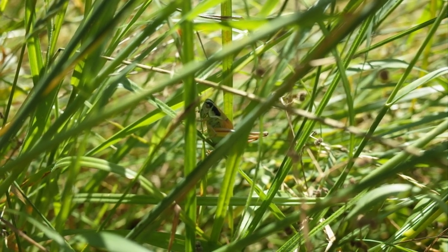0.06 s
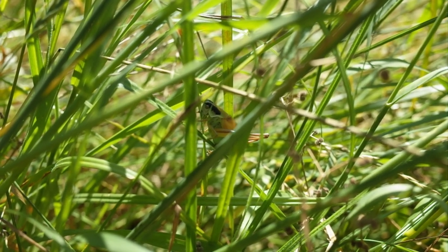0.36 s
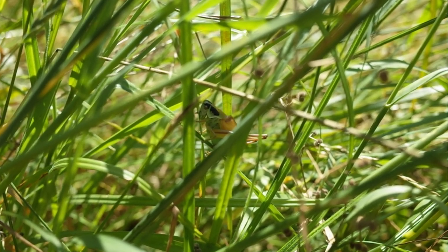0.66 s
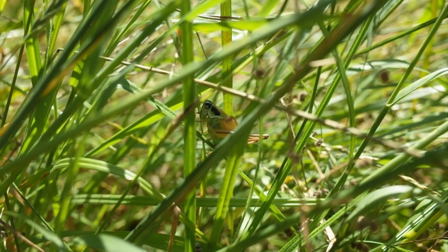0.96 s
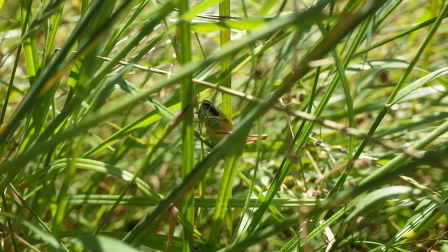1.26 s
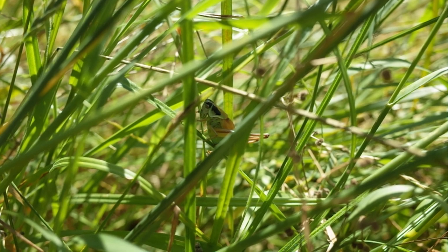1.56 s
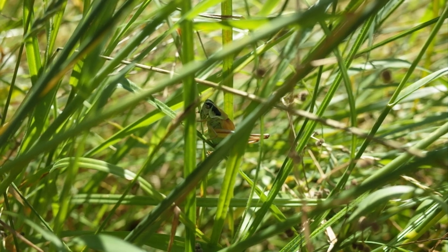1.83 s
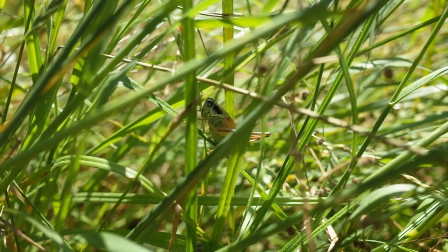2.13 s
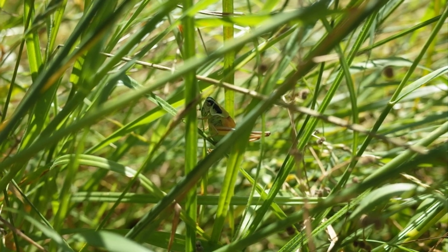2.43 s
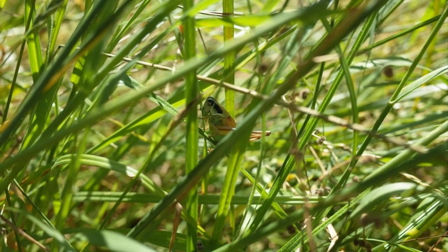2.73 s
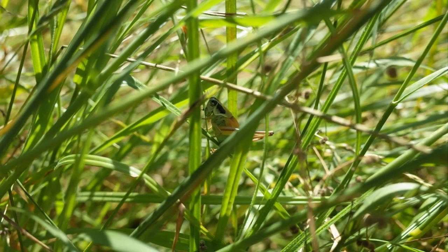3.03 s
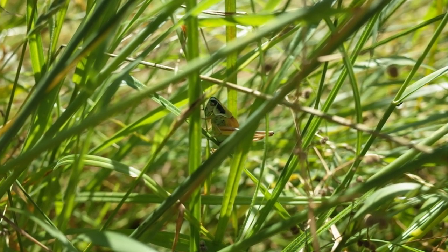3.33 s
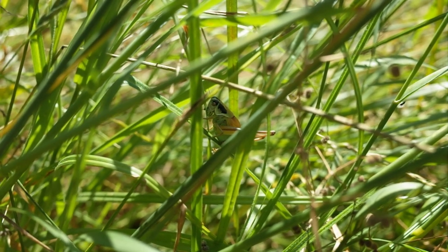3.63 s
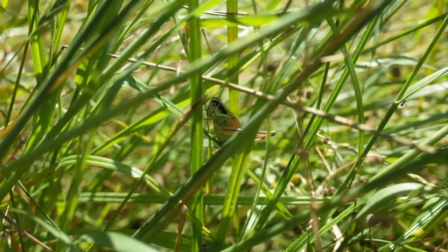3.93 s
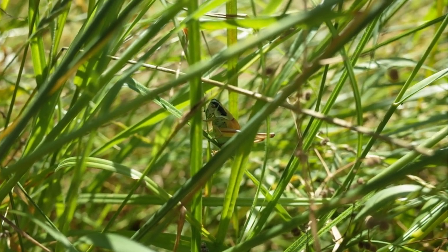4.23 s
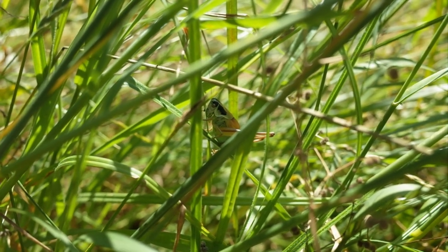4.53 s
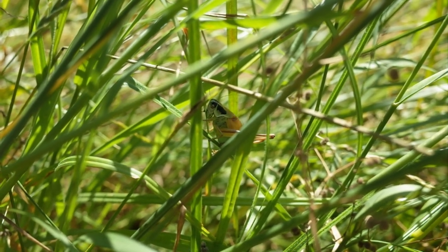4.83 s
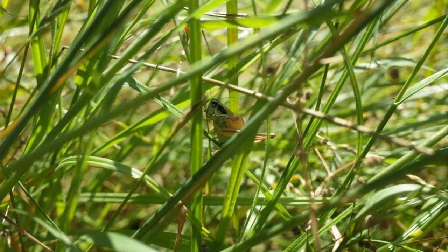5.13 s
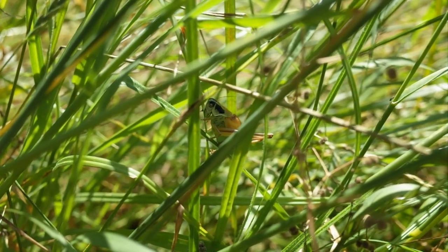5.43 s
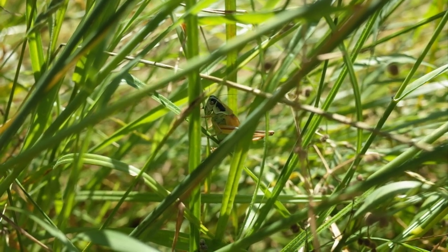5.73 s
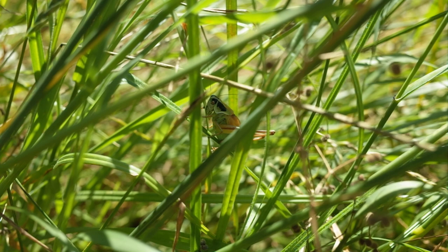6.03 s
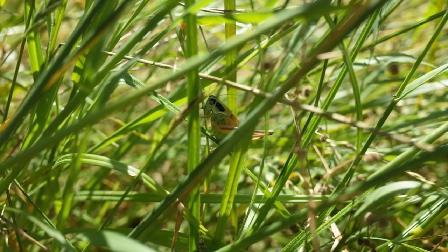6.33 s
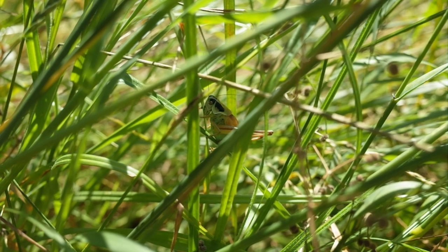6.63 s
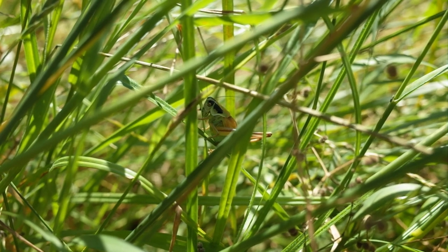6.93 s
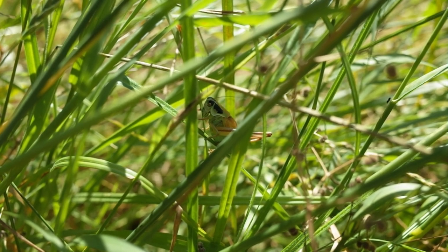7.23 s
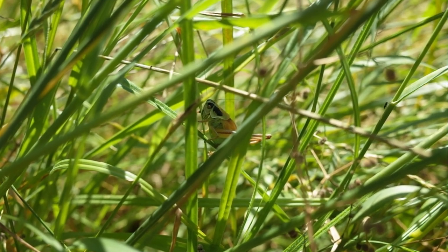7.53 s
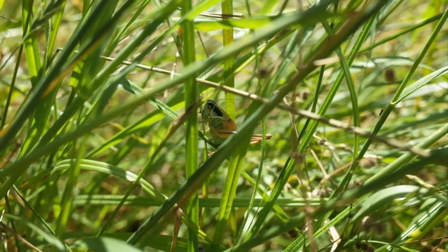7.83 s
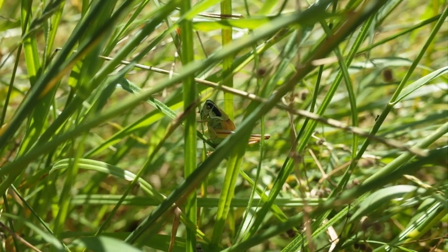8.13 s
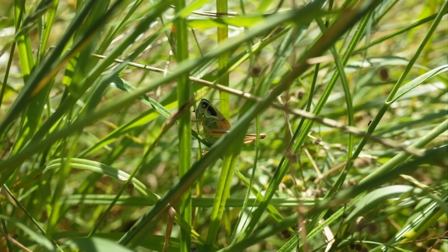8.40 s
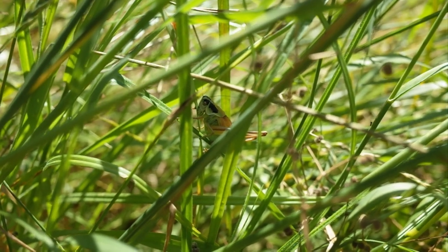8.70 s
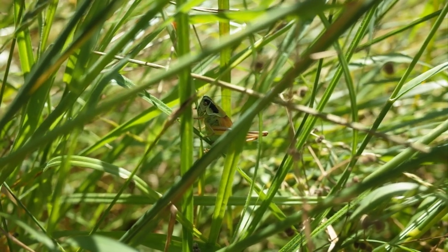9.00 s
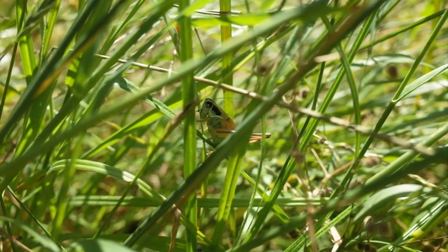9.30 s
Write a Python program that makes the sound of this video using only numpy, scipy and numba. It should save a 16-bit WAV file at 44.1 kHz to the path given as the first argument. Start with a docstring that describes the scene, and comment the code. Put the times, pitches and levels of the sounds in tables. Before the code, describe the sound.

A bush cricket rasps high, pulsing chirps up close in a meadow, with faint insects buzzing and answering further off.

```python
"""A bush cricket rasps in sunny grass, right at a camera's stereo microphone: two chirps, then the
start of a louder third. Its wings scuff softly open, then close with a run of tooth strikes.
Further off, other bush crickets answer or buzz, a grasshopper ticks and a far bird rolls short calls.
The lens motor taps faintly in the camera body. Each chirp overloads the gain control, so the
meadow ducks and swells back."""
import sys
import numpy as np
from scipy import signal
from scipy.fft import rfft, irfft
from scipy.io import wavfile
from scipy.ndimage import uniform_filter1d
from numba import njit

SR = 44100
rng = np.random.default_rng(int(sys.argv[2]) if len(sys.argv) > 2 else 0)


def wrap_up_sound(samples):
    """Save the sound to the file named by the first command line argument, as 16-bit audio."""
    columns = np.atleast_2d(samples).T
    # keep every value between -1 and 1, then stretch to whole-number steps
    tamed = np.clip(columns, -1, 1)
    steps = np.round(tamed * 32767).astype(np.int16)
    wavfile.write(sys.argv[1], SR, steps)


N = 421596
TIME = np.arange(N) / SR
FREQS = np.maximum(np.fft.rfftfreq(N, 1 / SR), 1)

# the near cricket's chirps: first_syllable_end_s, period_s, last_syllable_delay_s, level_db
NEAR_CHIRPS = [(0.3882, .0896, .0085, -0.5), (4.8434, .0887, .0135, 0), (9.588, .089, .01, 20.5)]
# three wing jerks ahead of each chirp: start_s, end_s, level_db, attack_s
WING_JERKS = [(.239, 0.251, -4, 0.00086), (.255, .266, 9.5, 0.003), (.268, .287, 10, 0.0014),
              (4.6943, 4.707, -1, 0.0024), (4.712, 4.723, 10.5, 0.0039), (4.724, 4.744, 12, 0.0038),
              (9.4305, 9.444, -0.5, 0.00089), (9.4497, 9.46, 6, .002), (9.4613, 9.486, 22.5, 0.019)]
# three scuffs of one wing opening: delay_s, length_s, level_db, pitch_ratio
OPENING_SCUFFS = [(-.0005, .0115, 2.1, 1.02), (0.013, .006, -1, 0.87), (.02, .008, -0.5, 1.03)]
# ring of the wing membrane: frequency_hz, level_db
WING_SPECTRUM = [(50, -66.5), (500, -35), (3500, -42.5), (5500, -39), (7200, -30), (8000, -15.5),
                 (8700, -4.5), (9400, 2.5), (10300, -1), (11200, -4.5), (12000, -2), (13100, -5.5),
                 (14400, -10.5), (15800, -19)]
# wing rubbing on wing: frequency_hz, level_db
RUB_SPECTRUM = [(2500, -66), (4400, -6.5), (5600, 13.5), (7000, 5), (9000, -13.5)]
# phase between the two microphone capsules: frequency_hz, left_lead_rad
MIC_PHASE = [(7500, -0.81), (10400, .15), (11700, -0.18), (13500, -0.83), (15000, 0.83)]
# balance between the capsules: frequency_hz, left_minus_right_db
MIC_BALANCE = [(8000, -1.5), (11000, -1), (14000, .4)]
# loud snaps at the hardest point of a stroke: time_s, level_db
HARD_SNAPS = [(.465, -15.5), (.645, -12.5), (.917, -11.5), (1.003, -22), (1.19, -20), (4.92, -14.5),
              (5.187, -13), (5.367, -16.5), (5.45, -11), (5.642, -8.5), (9.465, -14.5), (9.473, -3),
              (9.481, -3)]
# colour of a snap: frequency_hz, level_db
SNAP_SPECTRUM = [(60, 5), (400, 5), (4500, 5.5), (8000, -19.5)]
# crickets answering further off: first_s, last_s, period_s, level_db, treble_tilt_db_per_octave
ANSWERING_CHIRPS = [(.02, .905, .0885, -31, 10), (2.36, 2.6, .125, -51, -8), (2.73, 2.988, .13, -42.5, -14),
                    (3.11, 4.385, .127, -41, -23), (4.444, 5.433, .089, -30.5, 10),
                    (5.751, 7.738, .083, -39, 12), (8.763, 9.558, .0885, -32, 11)]
# course of the far crickets' buzz: time_s, level_db
BUZZ_LEVELS = [(0, -34.5), (1.4, -44), (2.3, -43.5), (3.2, -38.5), (4.2, -37.5), (5.8, -37.5), (7, -39.5),
               (7.8, -41.5), (8.3, -40), (9.5, -38.5)]
# colour of that buzz: frequency_hz, level_db
BUZZ_SPECTRUM = [(6500, -28.5), (8400, -12), (10500, -12.5), (12000, -4), (13000, -6), (14700, -1.5),
                 (15800, -9.5)]
# the grasshopper's verses: first_s, last_s, period_s, level_db
GRASSHOPPER_VERSES = [(3.31, 4.041, .0665, -36.5), (7.254, 8.043, .0657, -36.5)]
# rasp of its leg file: frequency_hz, level_db
LEG_SPECTRUM = [(4000, -31), (5400, -11.5), (5900, -4), (7000, -4), (7800, -4.5), (10000, -1), (12300, 7.5),
                (15800, 1.5)]
# resonances of its wing: frequency_hz, width_hz, lift_db
GRASSHOPPER_RINGS = [(5960, 180, 7.5), (6550, 100, 7), (6980, 120, 9)]
# the far bird's calls: start_s, end_s, level_db
BIRD_CALLS = [(1.58, 1.82, -56.5), (4.51, 4.687, -51), (7.435, 7.585, -51.2), (8.472, 8.61, -51.2)]
# dry stems ticking in the grass: time_s, level_db
DRY_TICKS = [(1.51, -36.5), (5.96, -34)]
# colour of a stem's tick: frequency_hz, level_db
STEM_SPECTRUM = [(300, 8), (1500, 1), (4000, -9), (9000, -15)]
# runs of lens motor taps: first_s, last_s, period_s
LENS_RUNS = [(0.062, .21, .15), (2.294, 3.169, .1455), (3.241, 4.248, .167), (4.508, 4.646, .14),
             (6.677, 8.091, .142), (8.328, 9.238, .152)]
# open air over the meadow: frequency_hz, level_db
AIR_SPECTRUM = [(15, -26.5), (25, 0.5), (150, -2.5), (194, -0.5), (264, -5), (394, -4.5), (476, -7.5),
                (662, -10.5), (879, -10), (2260, -17.5), (3370, -15.5), (3700, -18.5), (7000, -22.5),
                (9100, -56.5), (15400, -120)]
# how alike that air is at the two capsules: frequency_hz, correlation
AIR_CORRELATION = [(60, .3), (600, 0.39), (3000, 0)]
# the camera's circuit rumble: frequency_hz, level_db
CIRCUIT_SPECTRUM = [(20, 2), (90, -7), (300, -14.5), (2000, -38)]

OPENING_S = .029  # from the start of a syllable until the wings begin to close


def near_cricket(rebound=0.5, rebound_s=.00026, rub_db=-28):
    """Right at the microphone: a scraper strikes the teeth of a file, and each strike rings the wing."""
    times, sizes, pitches = np.transpose(jerks() + wing_beats())
    pitches = np.round(pitches * 32) / 32
    rebounds = times + rebound_s * np.exp(.3 * rng.standard_normal(len(times)))
    direct = 0
    for pitch in np.unique(pitches):
        sizes_at_pitch = sizes * (pitches == pitch)
        strikes = sum(share * np.bincount((t * SR).astype(int), sizes_at_pitch, N)[:N]
                      for t, share in [(times, 1), (rebounds, rebound)])
        direct = direct + signal.oaconvolve(strikes[None], wing_ring(pitch), axes=1)[:, :N]
    # the wings also rub as they open or jerk, lower in pitch than their ring
    _, starts, _, open_db, _ = np.transpose(syllables())
    jerk_start, jerk_end, jerk_db, _ = np.transpose(WING_JERKS)
    rubbing = swells(starts + OPENING_S / 2, 0.52 * undb(open_db / 3), width_s=0.011)
    rubbing += swells((jerk_start + jerk_end) / 2, .17 * undb(jerk_db / 2), width_s=0.0041)
    direct = direct + undb(rub_db) * rubbing * noise(across(RUB_SPECTRUM), correlation=1.0)
    return direct + grass(direct, t60_s=0.014, db=-13.5) + grass(direct, t60_s=0.13, db=-28.0)


def syllables(count=10, length_s=.0735, hurry_s=.01, growth_db=0.3):
    """The wing beats of the chirps, the first few hurried: number, start_s, end_s, open_db, close_db."""
    rows = []
    for first_end, period, hesitation, db in NEAR_CHIRPS:
        for k in range(count):
            first, last = k == 0, k == count - 1
            end = first_end + k * period + last * hesitation
            start = end - length_s + hurry_s * np.exp(-k / 1.9)
            effort_db = db - 0.32 * (-1) ** k  # every second beat is stronger
            open_db = effort_db + 0.35 + first * 1.5 + last * 4
            close_db = effort_db + 21 + k * growth_db
            if start < N / SR:
                rows.append((k, start, end, open_db, close_db))
    return rows


def wing_beats(scuff_scatter_s=0.00035, scuff_scatter_db=1.4, close_scatter_db=1.0, hold_s=.0175):
    """The wings scuff open, then close with a swelling rasp that sinks in pitch."""
    teeth = []
    for k, start, end, open_db, close_db in syllables():
        if k == 0:
            teeth += catch(start, open_db)
        for delay, length, db, pitch in OPENING_SCUFFS:
            late, hard = rng.standard_normal(2)
            at = start + delay + scuff_scatter_s * late
            scuff_db = open_db + db + scuff_scatter_db * hard
            teeth += stroke(at, at + length, scuff_db, tooth_ms=[0.37], pitch=[pitch],
                            attack_s=.001, release_s=0.001, jitter=.22, scatter_db=1.3)
        closes = start + OPENING_S
        swell_s = max(end - closes - hold_s, .002)
        rasp_db = close_db + close_scatter_db * rng.standard_normal()
        teeth += stroke(closes, end, rasp_db, tooth_ms=[.85, 1.45, 1.3, .82, 0.96], pitch=[1.074, 0.98],
                        attack_s=swell_s, release_s=0.0049, jitter=.2, scatter_db=0.82)
    return teeth


def jerks(per_chirp=3, teeth_per_jerk=26):
    """Short hard strokes over the same stretch of the file, so the shorter ones strike faster."""
    teeth = []
    for k, (start, end, db, attack_s) in enumerate(WING_JERKS):
        if k % per_chirp == 0:
            teeth += catch(start, db)
        gap_ms = 1000 * (end - start) / teeth_per_jerk
        teeth += stroke(start, end, db, tooth_ms=[gap_ms], pitch=[.98],
                        attack_s=attack_s, release_s=0.0047, jitter=.25, scatter_db=2.5)
    return teeth


def catch(stroke_start, stroke_db, lead_s=.0105, length_s=.008, softer_db=13.5):
    """The scraper touches the file lightly just ahead of a stroke."""
    start = stroke_start - lead_s
    return stroke(start, start + length_s, stroke_db - softer_db, tooth_ms=[.9], pitch=[.97],
                  attack_s=.002, release_s=0.0015, jitter=.25, scatter_db=3.5)


def stroke(start, end, db, tooth_ms, pitch, attack_s, release_s, jitter, scatter_db, bend=0.61):
    """The scraper presses, holds and lets go along the file. One row a tooth: time_s, size, pitch_ratio."""
    teeth, t = [], start
    for late, hard in rng.standard_normal((256, 2)):
        if t >= end:
            break
        # tooth spacing and wing pitch glide through their values over the stroke
        gap = np.interp(t, np.linspace(start, end, len(tooth_ms)), tooth_ms) / 1000
        ratio = np.interp(t, np.linspace(start, end, len(pitch)), pitch)
        pressure = min(1, (t - start + gap) / attack_s, (end - t) / release_s) ** bend
        teeth.append((t, pressure * undb(db + scatter_db * hard), ratio))
        t += gap * np.exp(jitter * late)
    return teeth


def wing_ring(pitch, size=512):
    """One strike rings the wing for a fraction of a millisecond, as each capsule hears it."""
    freqs = np.maximum(np.fft.rfftfreq(size, 1 / SR), 1)
    # minimum phase: the ring starts sharply, then decays
    cepstrum = irfft(np.log(undb(across(WING_SPECTRUM, freqs / pitch))))
    cepstrum[1:size // 2] *= 2
    cepstrum[size // 2 + 1:] = 0
    response = np.exp(rfft(cepstrum))
    leftward = undb(across(MIC_BALANCE, freqs) / 2) * np.exp(.5j * across(MIC_PHASE, freqs))
    ring = irfft([response * leftward, response / leftward])
    return np.roll(ring, 10, axis=1) / np.abs(irfft(response)).max()


def wing_snaps(lead_s=.01, scatter_s=.002, softer_db=41):
    """Each closing cracks faintly near its end, far below the wing's pitch; a few strokes crack hard."""
    faint = [(end - lead_s + scatter_s * rng.standard_normal(), close_db - softer_db)
             for _, _, end, _, close_db in syllables() if end < N / SR]
    times, db = np.transpose(HARD_SNAPS + faint)
    cracks = swells(times, undb(db), width_s=0.0025)
    return cracks * noise(across(SNAP_SPECTRUM), correlation=0.83) * pan(-2)


def answering_crickets(tilt_above_hz=9400):
    """Bush crickets further off; the grass smears their tooth strikes into throbs of hiss."""
    chirps = 0
    for first, last, period, db, tilt_db in ANSWERING_CHIRPS:
        throbs = swells(beats(first, last, period), 1.0, width_s=0.3 * period)
        colour_db = across(WING_SPECTRUM) + tilt_db * np.log2(np.maximum(FREQS / tilt_above_hz, 1))
        chirps = chirps + undb(db) * throbs * noise(colour_db, correlation=0.18)
    return chirps * pan(-1.2)


def buzzing_crickets(wing_hz=105.0, depth=0.17, waver=0.0083):
    """Far across the meadow, very fast wings merge into a high, finely pulsing hiss."""
    phase = 2 * np.pi * np.cumsum(wing_hz * (1 + waver * walk(8.3))) / SR
    pulsing = 1 + depth * (np.cos(phase) + .55 * np.cos(2 * phase))
    db = np.interp(TIME, *np.transpose(BUZZ_LEVELS)) + 0.34 * walk(12)
    return undb(db) * pulsing * noise(across(BUZZ_SPECTRUM)) * pan(-1.7)


def grasshopper(rise_db=6):
    """Leg strokes ring the wing fifteen times a second, growing over the first half of each verse."""
    strokes = 0
    for first, last, period, db in GRASSHOPPER_VERSES:
        times = beats(first, last, period)
        growth = np.minimum(np.linspace(-1, 1, len(times)), 0)
        sizes = undb(db + rise_db * growth)
        ticks = swells(times, sizes, width_s=0.0038)
        hiss_between = 0.27 * swells(times - period / 2, sizes, width_s=0.042)
        strokes = strokes + ticks + hiss_between
    rings_db = sum(db / (1 + (2 * (FREQS - hz) / width) ** 2) for hz, width, db in GRASSHOPPER_RINGS)
    return strokes * noise(across(LEG_SPECTRUM) + rings_db, correlation=0.053)


def far_bird(pitch_hz=955, roll_hz=44, sharpness=1.9, waver=0.033):
    """One low note a call, rolled by a fast flutter and blurred by the distance."""
    calls = sum(undb(db) * uniform_filter1d(1. * ((TIME > start) & (TIME < end)), size=1500)
                for start, end, db in BIRD_CALLS)
    roll = np.exp(sharpness * np.cos(2 * np.pi * roll_hz * TIME))
    tone = np.sin(2 * np.pi * np.cumsum(pitch_hz * (1 + waver * walk(150))) / SR)
    direct = calls * unit(roll * tone) * pan(-1.4)
    return direct + grass(direct, t60_s=.18, db=-4)


def dry_stems():
    """A dry stem ticks in the grass now and then."""
    times, db = np.transpose(DRY_TICKS)
    return swells(times, undb(db), width_s=0.00088) * noise(across(STEM_SPECTRUM), correlation=0.51)


def lens_motor(body_hz=370, db=-48, scatter_s=.004):
    """Runs of soft taps in the camera body, to the right, over weaker steady steps."""
    times = np.concatenate([beats(*run) for run in LENS_RUNS])
    times = times + scatter_s * rng.standard_normal(len(times))
    taps = swells(times, 0.95, width_s=0.0036)
    step_times = beats(0, N / SR, 0.1)
    steps = 0.18 * swells(step_times, rng.random(len(step_times)), width_s=0.0049)
    body = np.sin(2 * np.pi * np.cumsum(body_hz * (1 + .12 * walk(500))) / SR)
    return undb(db) * (taps + steps) * unit(body) * pan(-9)


def meadow_air(db=-49.5):
    """Faint rumble and hiss of the open meadow, all around the microphone."""
    return undb(db + .5 * walk(4)) * noise(across(AIR_SPECTRUM), across(AIR_CORRELATION)) * pan(-0.26)


def grass(sound, t60_s, db):
    """Stems and blades scatter a short tail, different on each side."""
    t = TIME[:SR // 4]
    tail = rng.standard_normal((2, len(t))) * np.exp(-np.log(1000) * t / t60_s) * (t > .0004)
    tail *= undb(db) / np.sqrt(np.sum(tail ** 2, axis=1, keepdims=True))
    return signal.fftconvolve(sound, tail, axes=1)[:, :N]


def undb(db):
    """Decibels to gain."""
    return 10 ** (np.asarray(db) / 20)


def unit(x):
    """Scale to rms 1."""
    return x / np.sqrt(np.mean(x ** 2))


def across(points, freqs=FREQS):
    """Join (frequency_hz, value) points on a log-frequency axis."""
    hz, value = np.transpose(points)
    return np.interp(np.log(freqs), np.log(hz), value)


def noise(spectrum_db, correlation=0):
    """Stereo noise of a given spectral shape, rms 1."""
    mid, side = rfft(rng.standard_normal((2, N))) * undb(spectrum_db)
    mid, side = mid * np.sqrt(1 + correlation), side * np.sqrt(1 - correlation)
    return unit(irfft([mid + side, mid - side], N))


def pan(db):
    """Channel gains for a left-minus-right level."""
    return undb(np.array([[db], [-db]]) / 2)


def walk(rate_hz):
    """Smooth random wandering, spread near 1."""
    knots = np.arange(0, N / SR + 1, 1 / rate_hz)
    return np.interp(TIME, knots, rng.standard_normal(len(knots)))


def swells(times, sizes, width_s):
    """A bell-shaped swell at each of the times."""
    marks = np.zeros(N)
    np.add.at(marks, np.clip((np.asarray(times) * SR).astype(int), 0, N - 1), sizes)
    bell = signal.windows.gaussian(SR // 4, width_s * SR)
    return signal.fftconvolve(marks, bell, "same")


def beats(first, last, period):
    """Evenly spaced times from first to last."""
    return np.linspace(first, last, int(round((last - first) / period)) + 1)


@njit
def gain_control(over_db, attack, release_db):
    """The camera's gain in dB drops fast while peaks pass the ceiling, then climbs steadily back."""
    gains_db, gain_db = np.empty(len(over_db)), 0.
    for i in range(len(over_db)):
        excess_db = over_db[i] + gain_db
        if excess_db > 0:
            gain_db -= attack * excess_db
        else:
            gain_db = min(gain_db + release_db, 0.)
        gains_db[i] = gain_db
    return gains_db


def scene():
    """The meadow at the microphone: one cricket up close, the other singers further off."""
    close = near_cricket() + wing_snaps()
    distant = answering_crickets() + buzzing_crickets() + grasshopper() + far_bird()
    return close + distant + dry_stems() + lens_motor() + meadow_air()


def record(dry, ceiling_db=-2.0, attack_s=0.00064, release_db_per_s=22, circuit_db=-70, top_hz=15750):
    """The camera turns its gain down, clips what overshoots, adds faint rumble and cuts the top."""
    over_db = 20 * np.log10(np.abs(dry).max(axis=0) + 1e-9) - ceiling_db
    gain_db = gain_control(over_db, 1 / (attack_s * SR), release_db_per_s / SR)
    driven = dry * undb(gain_db)
    clipped = np.clip(driven, -1, 1)
    # the overload is lopsided, so the hardest tooth strikes leave a low crackle
    clipped = clipped - 0.082 * np.abs(driven - clipped)
    rumble = undb(circuit_db) * noise(across(CIRCUIT_SPECTRUM), correlation=0.32)
    lowpass = signal.ellip(10, .2, 70, top_hz, fs=SR, output="sos")
    return signal.sosfilt(lowpass, clipped + rumble)


dry = scene()
out = record(dry)
wrap_up_sound(out)
```